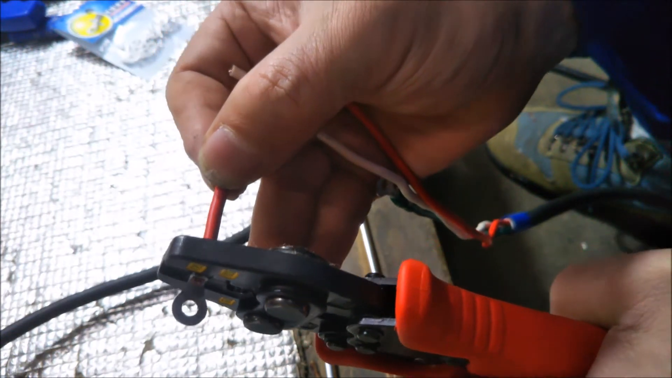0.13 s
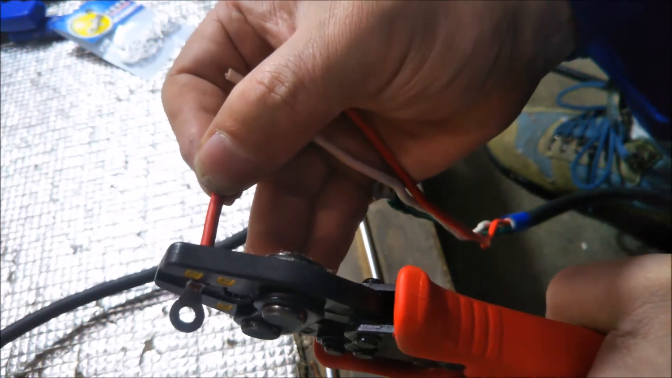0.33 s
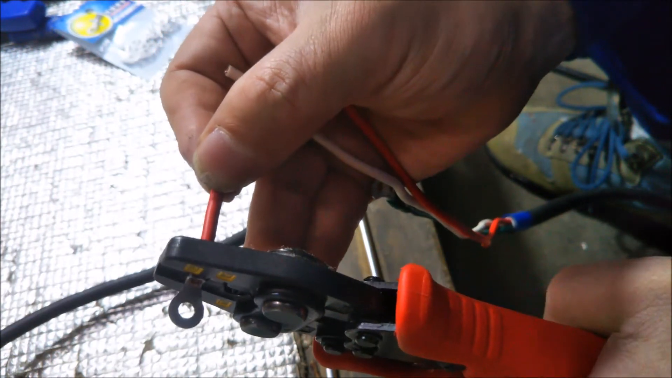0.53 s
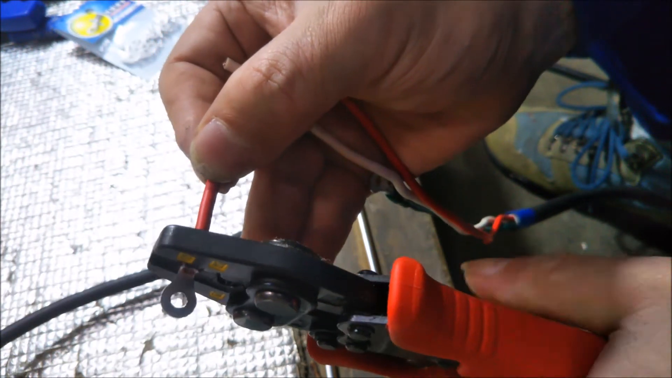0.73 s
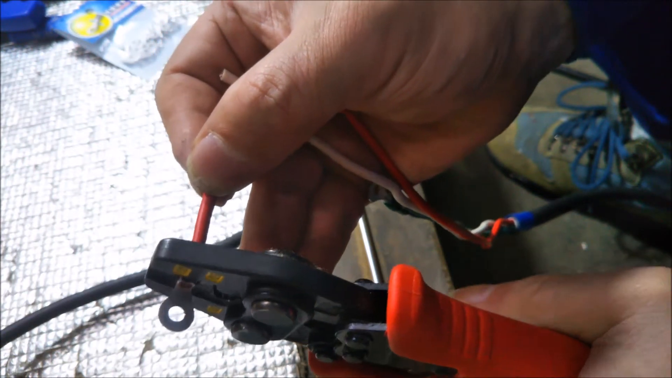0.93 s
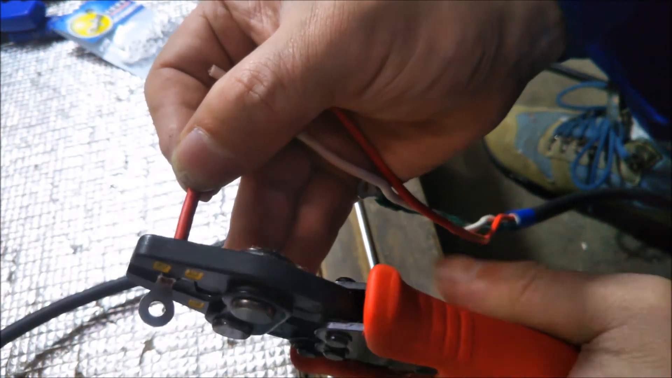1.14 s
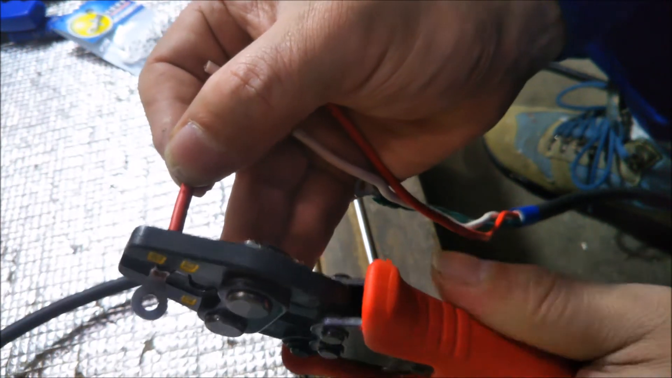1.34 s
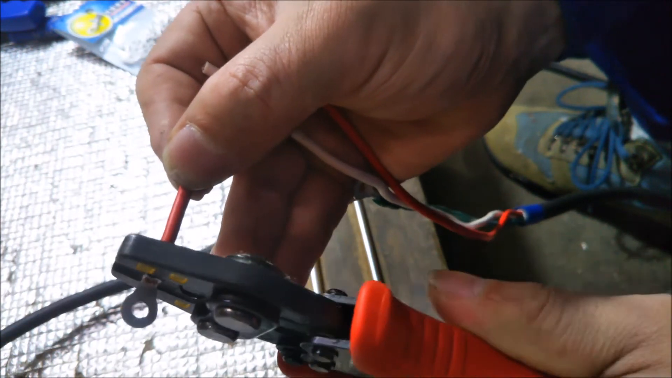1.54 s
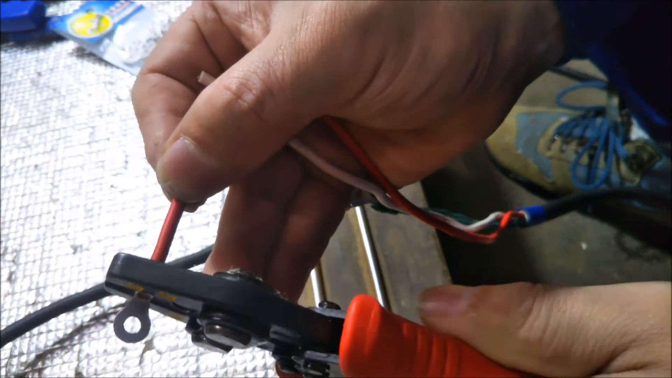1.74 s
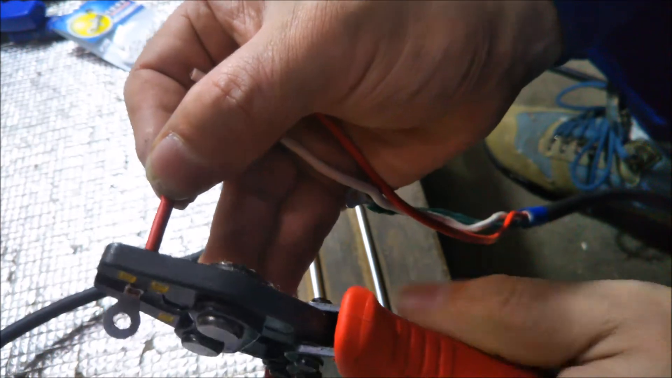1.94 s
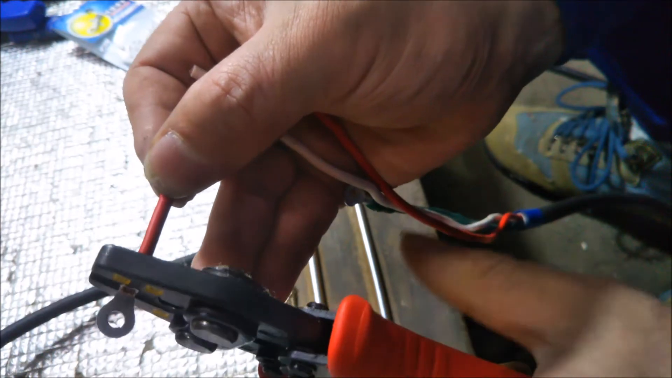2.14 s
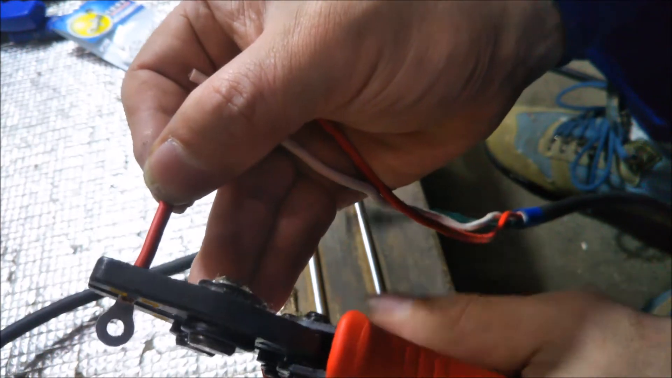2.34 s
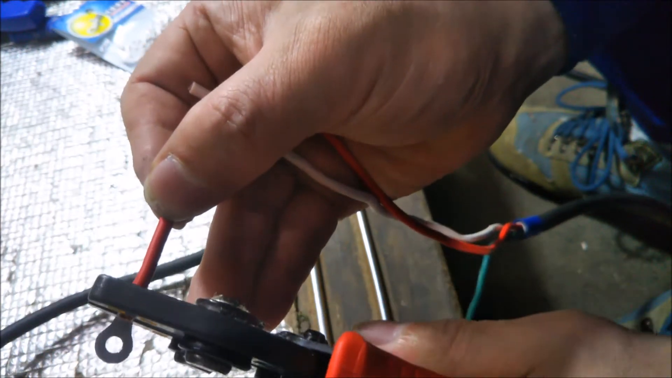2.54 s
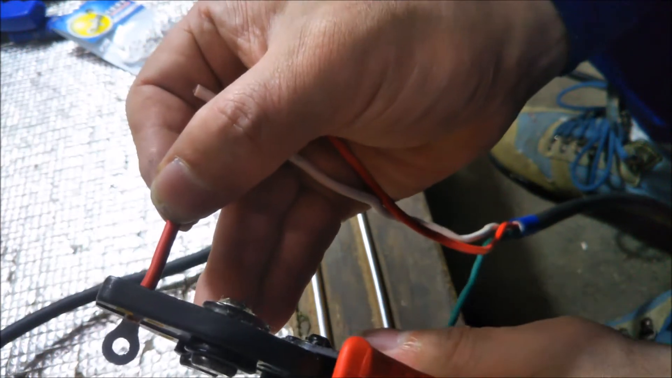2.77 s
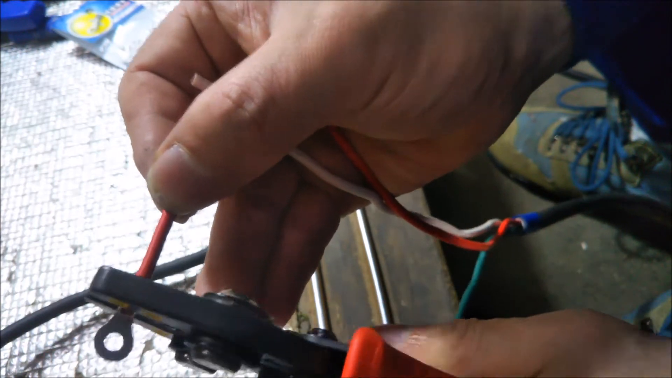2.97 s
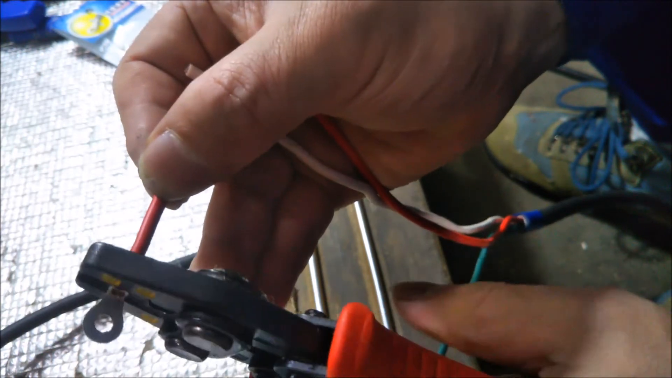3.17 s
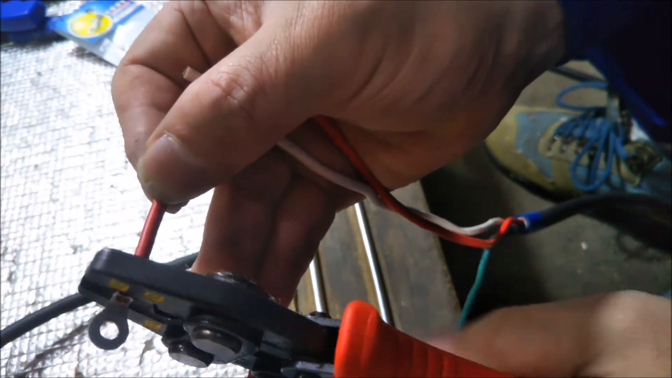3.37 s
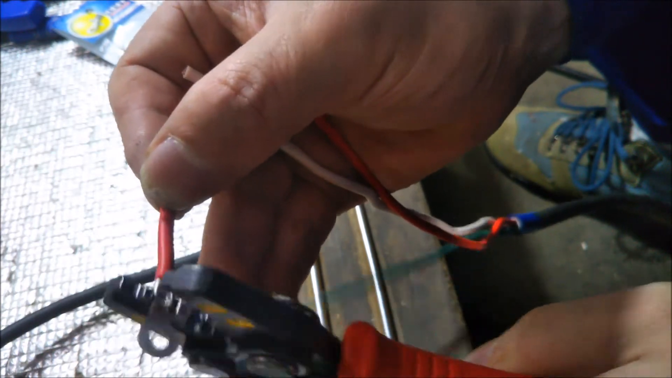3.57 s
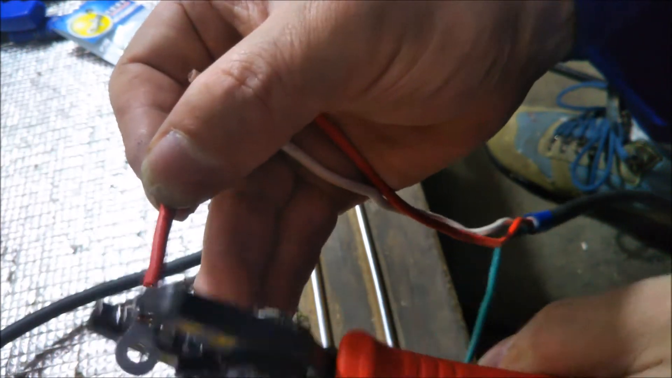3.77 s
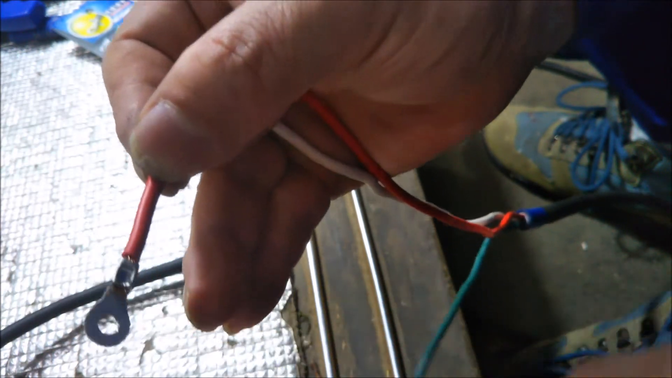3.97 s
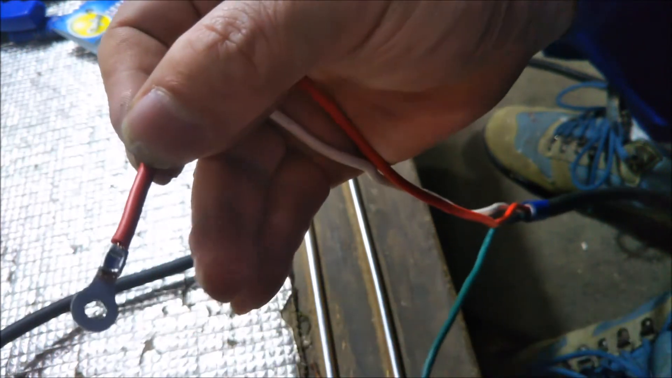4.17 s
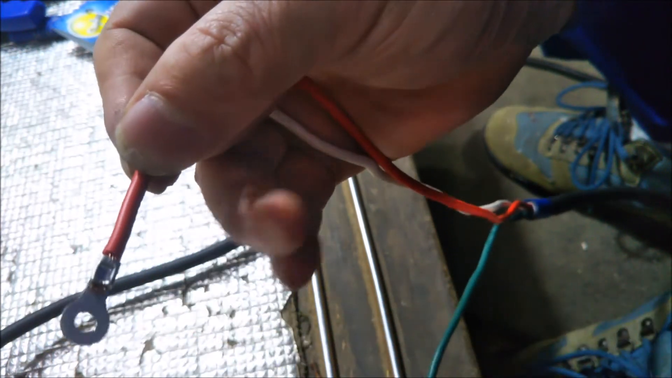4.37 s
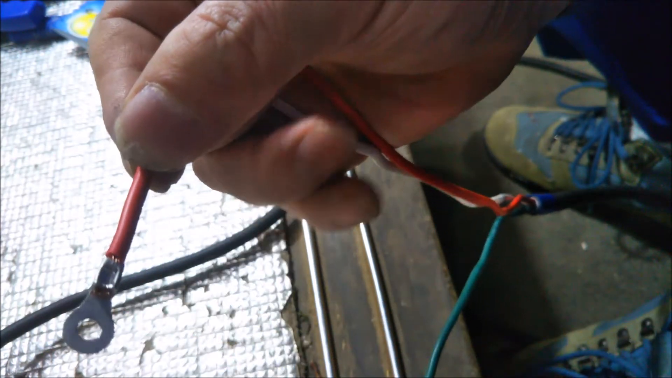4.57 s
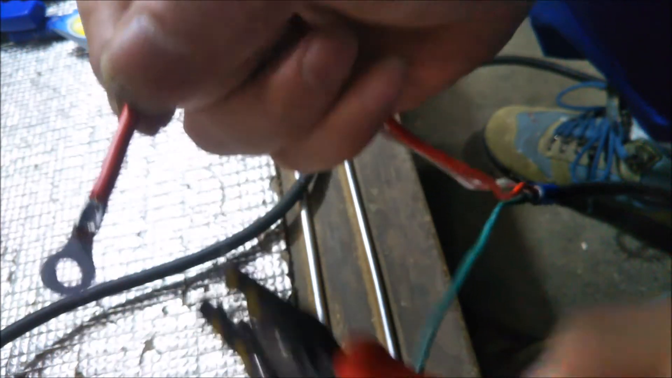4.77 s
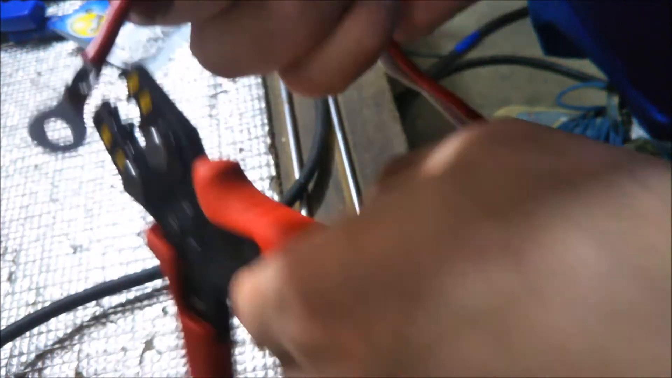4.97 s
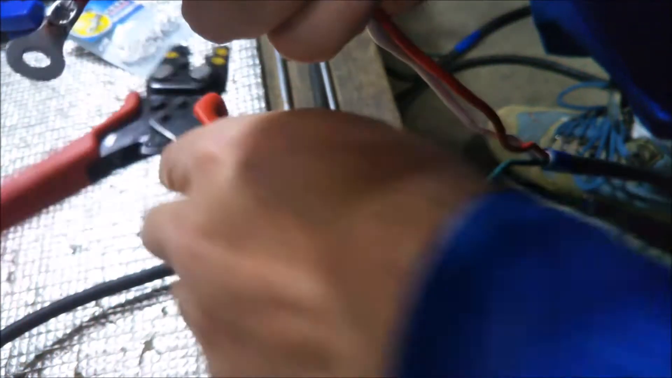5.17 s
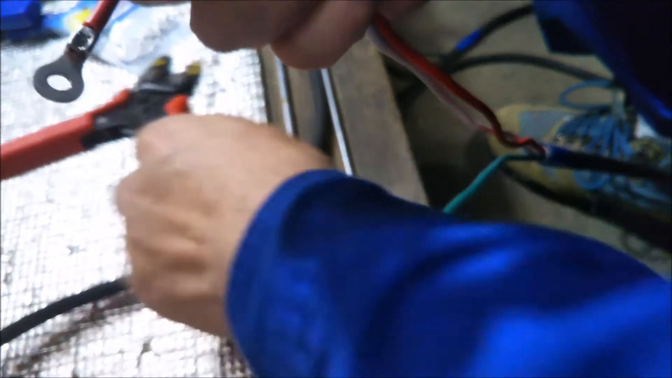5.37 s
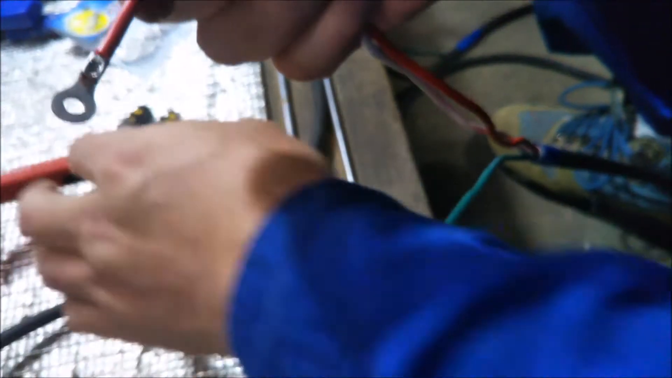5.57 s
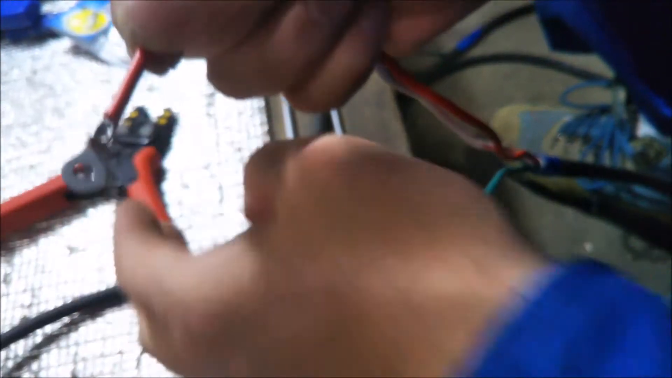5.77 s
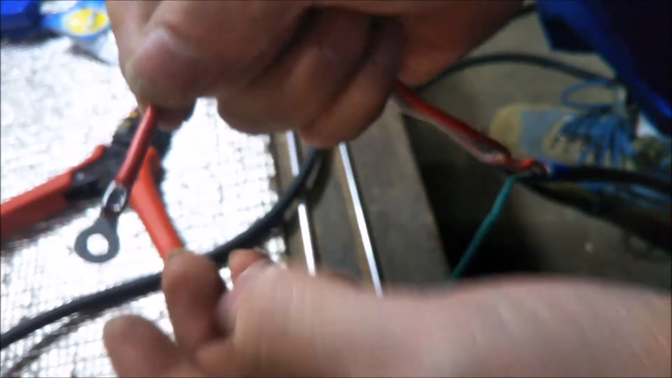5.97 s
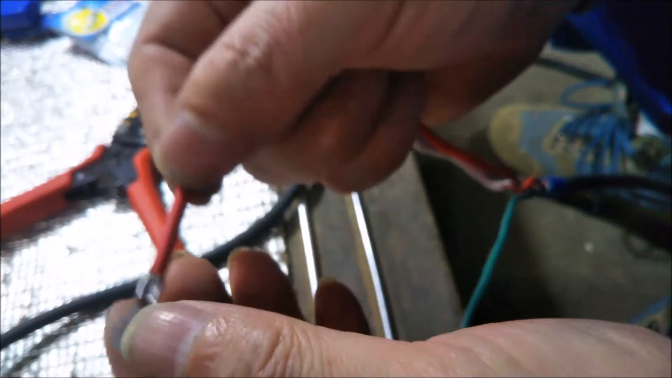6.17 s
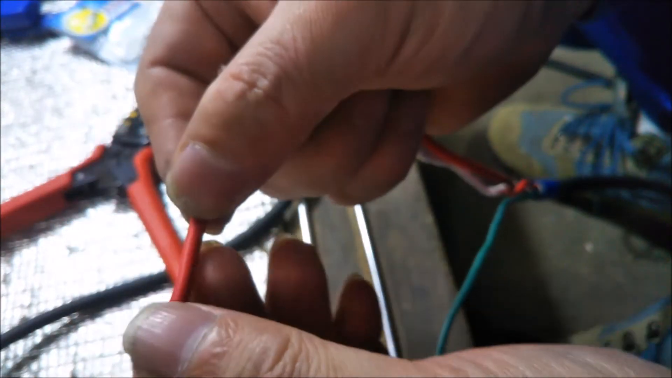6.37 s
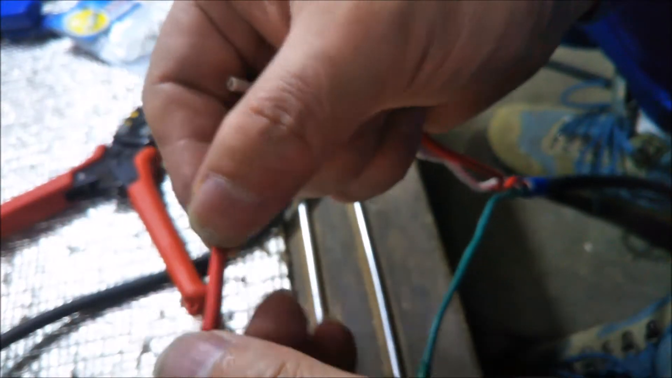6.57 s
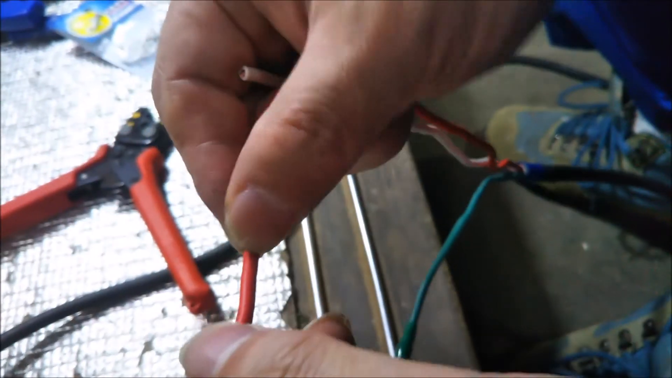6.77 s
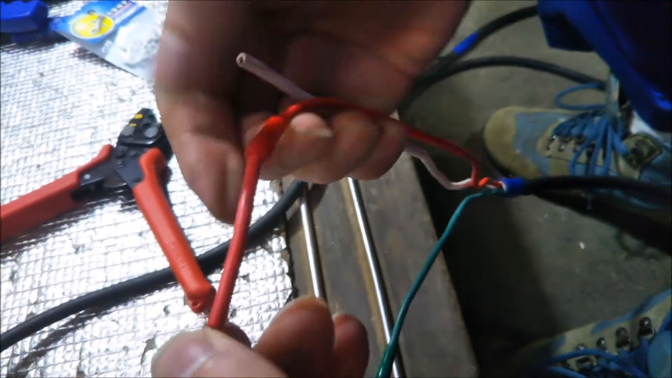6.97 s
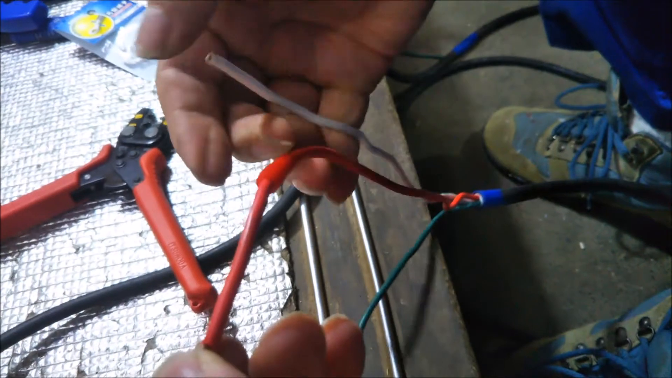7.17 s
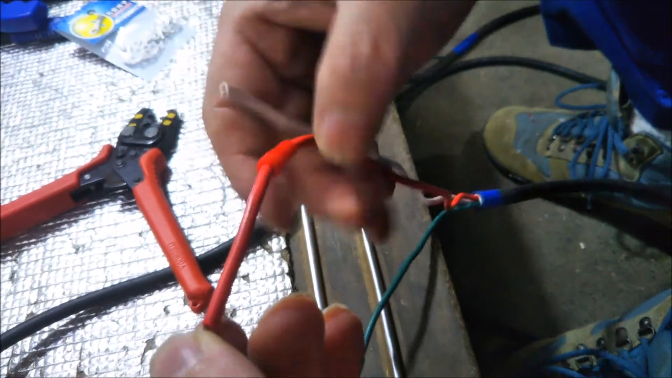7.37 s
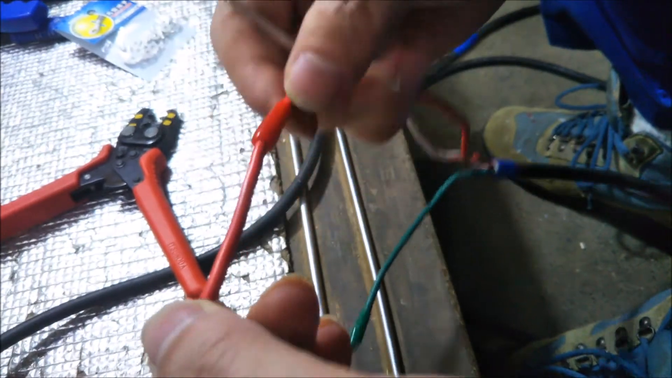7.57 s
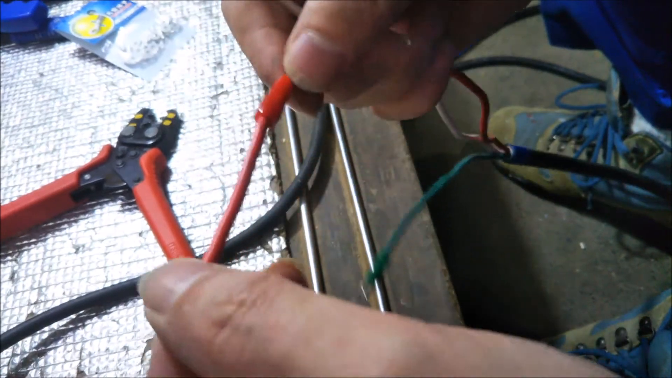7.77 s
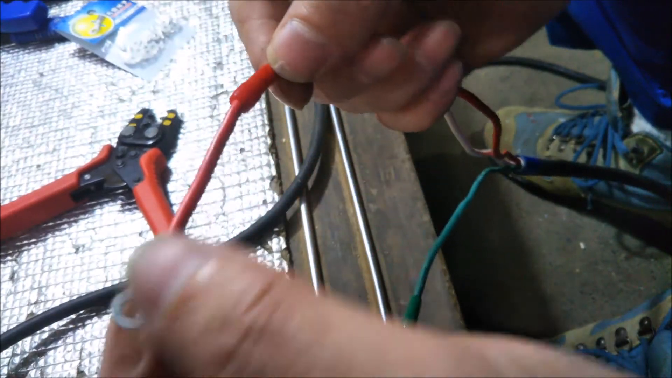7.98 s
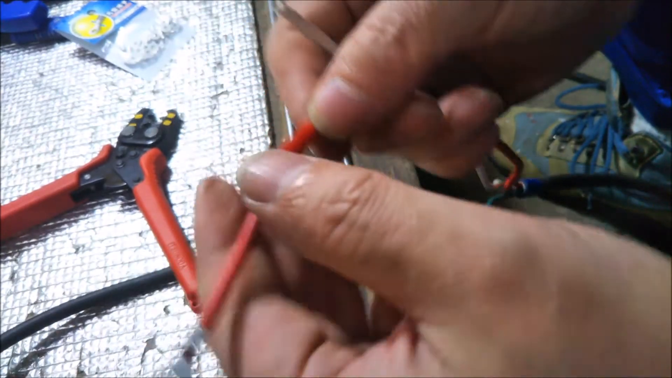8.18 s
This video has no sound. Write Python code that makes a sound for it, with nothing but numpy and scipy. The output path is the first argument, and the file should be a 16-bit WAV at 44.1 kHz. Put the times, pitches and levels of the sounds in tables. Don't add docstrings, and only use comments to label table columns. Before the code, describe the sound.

A low ventilation hum and faint, drifting hiss run throughout in a workshop, heard through a small camera microphone very close to the action. A sharp ratchet click is already ringing at 0 seconds; another snaps at 0.3 and the loudest of these at 0.9, each bright, dry and thinly ringing. A softer double click comes at 2.4. Faint rubs precede the release at 3.4, when about fourteen loud clicks rattle past, quickening until 3.57, with a springy pluck and a tiny fading shiver at the stop. Soft low rubbing and faint touches follow around 4.3. Steel taps wood at 4.7, then knocks hard at 4.82 with a brief rebound. At 5.53 the tool lands on a padded bench: a low boom, rapid bounces, a rough scrape and bright ticks settling by 5.8. Afterwards just hum and slight hand rubs near 6.0, 6.8 and 7.9, until about 8 seconds.

```python
import sys
import numpy as np
from scipy import signal
from scipy.fft import rfft, irfft, next_fast_len
from scipy.io import wavfile
from scipy.ndimage import uniform_filter1d

SR = 44100
rng = np.random.default_rng(int(sys.argv[2]) if len(sys.argv) > 2 else 0)


def field_ratio(decibels):
    return 10 ** (np.asarray(decibels, dtype=float) / 20)


def materialize(psi):
    bounded = np.clip(np.atleast_2d(psi).T, -1, 1)
    quanta = np.round(bounded * 32767).astype(np.int16)
    wavfile.write(sys.argv[1], SR, quanta)


N = 362046
LEAD = SR // 10

# pitch in Hz, width in Hz, level in dB.
PAWL = [(10700, 500, -2), (11900, 880, -1), (13600, 690, 4)]
# pitch in Hz, width in Hz, level in dB.
RACK = [(5830, 270, -2.5), (6910, 890, -2.5), (8630, 3300, -6)]
# pitch in Hz, width in Hz, level in dB.
JAWS = [(2350, 1800, -2), (3780, 2360, 5.5), (4470, 1030, 8)]


def unit(x):
    return x / np.sqrt(np.mean(x ** 2) + 1e-20)


def along(points, hz):
    f, v = np.transpose(points)
    return np.interp(np.log(hz + 1), np.log(f + 1), v)


def filtered(x, response):
    m = next_fast_len(x.shape[-1] + 8192)
    hz = np.fft.rfftfreq(m, 1 / SR)
    return irfft(rfft(x, m) * response(hz), m)[..., :x.shape[-1]]


def resonances(modes):
    def response(f):
        total = 0
        for k, (centre, width, db) in enumerate(modes):
            damping = 1j * f * width
            total = total + (-1) ** k * field_ratio(db) * damping / (centre * centre - f * f + damping)
        return total
    return response


def noise(spectrum):
    return unit(filtered(rng.standard_normal(N), lambda hz: field_ratio(along(spectrum, hz))))


def blow(contact_ms, modes, size=4096):
    ms = np.arange(size) * 1000 / SR
    y = filtered(ms * np.exp(-ms / contact_ms), resonances(modes))
    return y / np.abs(y).max()


def burst(rise_ms, t60_ms, modes, size=4096):
    ms = np.arange(size) * 1000 / SR
    shape = (1 - np.exp(-ms / rise_ms)) ** 2 * field_ratio(-60 * ms / t60_ms)
    impacts = np.tanh(2 * rng.standard_normal(size))
    y = filtered(shape * impacts, resonances(modes))
    return y / np.abs(y).max()


def ringing(modes, scatter_db, attack_ms, size):
    t = np.arange(size) / SR
    y = np.zeros(size)
    for hz, db, t60 in modes:
        y += field_ratio(db + scatter_db * rng.normal() - 60 * t / t60) * np.sin(2 * np.pi * hz * t)
    return y * (1 - np.exp(-1000 * t / attack_ms))


def rings_on(modes, swell):
    y = np.zeros(SR // 2)
    for hz, db, t60 in modes:
        y += ringing([(hz, db, t60)], scatter_db=4.0, attack_ms=1000 * swell * t60 + .5, size=SR // 2)
    return y


def silence():
    return np.zeros(LEAD + N + SR)


def add(track, s, y):
    track[LEAD + round(s * SR):][:len(y)] += y


def workshop():
    # pitch in Hz, level in dB per Hz.
    hum = [(15, -51), (25, -2), (39, -6.5), (59, 1.5), (112, -4.5), (150, -7), (229, -6.5), (318, -11.5),
           (624, -9.5), (715, -10.5), (772, -11.5), (1320, -10), (2500, -14.5), (3250, -41), (5500, -120)]
    # pitch in Hz, level in dB per Hz.
    hiss = [(880, -32), (1500, 0.5), (2270, -1), (2740, -1.5), (3010, -3), (3560, -5.5), (4140, -7.5),
            (4720, -11), (5810, -25), (6440, -20), (7850, -15.5), (9840, -16.5), (14200, -12.5)]
    above = lambda hz: np.clip(hz / 1000 - 1.5, 0, 1)
    low = filtered(noise(hum), lambda hz: np.sqrt(1 - above(hz)))
    high = filtered(noise(hiss), lambda hz: np.sqrt(above(hz)))
    z = signal.stft(low + field_ratio(-2.5) * high, nperseg=512)[2]
    patches = uniform_filter1d(rng.standard_normal(z.shape), size=8, axis=0)
    patches = uniform_filter1d(patches, size=12, axis=1)
    air = signal.istft(z * field_ratio(0.97 * unit(patches)), nperseg=512)[1][:N]
    return field_ratio(-53) * unit(air)


def room(x):
    # pitch in Hz, time to fall by 60 dB in seconds.
    walls = [(100, 0.35), (1000, 0.51), (4000, 0.97), (14000, 0.92)]
    hz, t, z = signal.stft(rng.standard_normal(SR // 2), SR, nperseg=256)
    tail = signal.istft(z * field_ratio(-60 * t / along(walls, hz)[:, None]), SR, nperseg=256)[1]
    tail = tail * (1 - np.exp(-np.arange(len(tail)) / SR / 0.0035))
    return signal.fftconvolve(x, tail / np.linalg.norm(tail))[:len(x)]


def rubs():
    # start in seconds, length in seconds, level in dB, centre in Hz, width in Hz.
    slides = [
        (1.496, 0.15, -66, 5000, 2500),
        (2.163, 0.12, -67, 11000, 2000),
        (2.955, 0.15, -62.5, 7360, 1600),
        (3.138, 0.075, -57, 520, 149),
        (4.277, 1, -56.5, 696, 910),
        (4.372, 0.14, -55.5, 1070, 148),
        (6.018, 0.12, -64, 6500, 3000),
        (6.786, 0.11, -66.5, 7000, 4020),
        (7.882, 0.15, -64, 8600, 2500),
    ]
    out = silence()
    for s, length, db, hz, width_hz in slides:
        progress = np.clip(np.arange(SR // 2) / SR / length, 0, 1)
        band = lambda f: np.exp(-((f - hz) / width_hz) ** 2)
        hiss = unit(filtered(rng.standard_normal(SR // 2), band))
        add(out, s, field_ratio(db) * np.sin(np.pi * np.sqrt(progress)) * hiss)
    return out


def thumps():
    # start in seconds, level in dB.
    bounces = [(5.5374, -14), (5.5444, -16), (5.5525, -18.5), (5.5587, -11.5), (5.598, -28), (5.615, -36.5),
               (5.645, -43), (5.694, -35), (5.708, -48), (5.75, -47), (5.823, -47)]
    # pitch in Hz, level in dB, time to fall by 60 dB in seconds.
    top_tones = [(128, 5, 0.055), (175, -10.5, 0.1), (240, -24, 0.15), (325, -12, 0.016)]
    leg_tones = [(80, 1.5, 0.085)]
    out = silence()
    for s, db in bounces:
        add(out, s, field_ratio(db) * ringing(top_tones, scatter_db=2.5, attack_ms=3.4, size=SR // 2))
        add(out, s, field_ratio(0.91 * db) * ringing(leg_tones, scatter_db=2.0, attack_ms=4.5, size=SR // 2))
    return out


def ticks():
    # start in seconds, peak in dB, treble in dB.
    taps = [(5.5268, -18.5, -23), (5.5337, -16, -11), (5.5384, -28, -11), (5.541, -22.5, 8),
            (5.5505, -24, -10), (5.5557, -25, -17), (5.5967, -31, 2), (5.6068, -35, -8),
            (5.6433, -35.5, -1), (5.6488, -39, 8), (5.688, -29, -6), (5.6937, -33.5, -10),
            (5.699, -33, -12), (5.7284, -41.5, 5), (5.7364, -44, 9), (5.7511, -24.5, -26)]
    dull_modes = [(1470, 1400, -5), (2640, 1100, -0.5), (3520, 670, -1.5)]  # Hz, width in Hz, dB
    out = silence()
    for s, db, treble_db in taps:
        add(out, s, field_ratio(db - 2.5) * burst(0.08, 21, dull_modes))
        add(out, s, field_ratio(db + treble_db - 5.0) * burst(0.66, 13, RACK + PAWL))
    return out


def scrapes():
    # start in seconds, length in seconds, level in dB, fade in dB per second.
    strokes = [
        (5.531, 0.11, -28, 404),
        (5.641, .1, -53, 35),
    ]
    # pitch in Hz, level in dB.
    pad_colour = [(400, -8.5), (900, -4.5), (2600, -9), (4500, -12.5), (5800, -27)]
    # pitch in Hz, level in dB.
    fizz_colour = [(5500, -40), (7000, -6), (10000, 4.5), (13500, 0), (15000, 1)]
    rise_s, end_db_per_s, fizz_db, fizz_follow = 0.0036, 424, -9.5, 0.76
    body, fizz = np.zeros(N), np.zeros(N)
    for s, length, db, fade in strokes:
        t = np.clip(np.arange(N) / SR - s, 0, 1)
        rise = 1 - np.exp(-t / rise_s)
        level_db = db - fade * t - end_db_per_s * np.maximum(t - length, 0)
        body += rise * field_ratio(level_db)
        fizz += rise * field_ratio(fizz_follow * level_db)
    grit = field_ratio(3.2 * unit(uniform_filter1d(rng.standard_normal(N), size=90)))
    out = silence()
    add(out, 0, grit * (body * noise(pad_colour) + field_ratio(fizz_db) * fizz * noise(fizz_colour)))
    return out


def knocks():
    # start in seconds, peak in dB, treble in dB, bass in dB.
    hits = [
        (4.278, -41, -25, -24),
        (4.333, -39, -22, -7),
        (4.354, -48, -25, -13),
        (4.679, -21.5, -23, -30),
        (4.683, -18.5, -25, -31),
        (4.6845, -17, -31, -17),
        (4.8225, -31, -20.5, -25),
        (4.8245, -3.5, -33.5, -22),
        (4.8285, -18, -33.5, -10.5),
        (4.834, -16.5, -40, -16),
    ]
    # pitch in Hz, width in Hz, level in dB.
    rail_modes = [(390, 540, 8), (583, 620, 2.5), (910, 75, -5), (1180, 570, 6), (1576, 244, 10),
                  (2090, 1280, 2), (3240, 200, -24), (3330, 230, -2), (4200, 1100, -3)]
    # pitch in Hz, level in dB, time to fall by 60 dB in seconds.
    tap_tones = [(829, -29, .05), (1555, -20, .045), (3000, -33, .03)]
    knock_tones = [(570, -39, 0.036), (1000, -28, .07), (1230, -25, 0.038), (1396, -23, 0.11),
                   (2134, -29.5, 0.15), (3050, -37.5, 0.15), (3580, -23.5, 0.023)]
    push_modes = [(107, 30, -5.0), (176.0, 79, 4.0), (252, 220, -1)]  # Hz, width in Hz, dB
    wood, steel = rail_modes[:-1], RACK + PAWL
    out = silence()
    for s, db, treble_db, bass_db in hits:
        add(out, s, -field_ratio(db - 2.0) * blow(0.04, wood))
        add(out, s + .0007, field_ratio(db - 10) * burst(0.21, 35, wood))
        add(out, s, field_ratio(db + bass_db + 4.0) * burst(0.73, 69, push_modes, size=8192))
        add(out, s, field_ratio(db + treble_db + 14) * burst(.3, 12, steel))
        add(out, s, field_ratio(db - 19.5) * burst(4.0, 254, wood, size=16384))
        add(out, s, field_ratio(db + treble_db - 8) * burst(3.3, 220, steel, size=16384))
    add(out, hits[5][0], rings_on(tap_tones, swell=.03))
    add(out, hits[7][0], rings_on(knock_tones, swell=0.014))
    return out


def click(db, rack_db, jaw_db, handle_db, chatter_db):
    parts = [(PAWL, -2.5, 0, -28),  # ringing, share in dB, delay in seconds, walls in dB
             (RACK, rack_db + 0.5, .0003, -27),
             (JAWS, jaw_db, .0006, -22)]
    handle_modes = [(470, 720, -4), (1830, 140, -4.5)]  # Hz, width in Hz, dB
    out = np.zeros(LEAD + 12288)
    for modes, share_db, late, wall_db in parts:
        part_db = db + share_db
        add(out, late, field_ratio(part_db) * burst(0.31, 3.5, modes, size=2048))
        add(out, late + .0012, field_ratio(part_db + chatter_db) * burst(.5, 14, modes, size=2048))
        add(out, 0, field_ratio(part_db + wall_db) * burst(11.0, 280, modes, size=12288))
    add(out, 0, field_ratio(db + handle_db) * burst(0.75, 28, handle_modes, size=2048))
    return out[LEAD:]


def release():
    # start in seconds, peak in dB, rack in dB.
    clicks = [(3.4345, -2, -11.5), (3.4447, -4, -10), (3.4553, 0.5, -8.5), (3.4930, -4, -3.5),
              (3.5131, -4, -7), (3.5263, -2.5, -13.5), (3.5355, -7.5, 2), (3.5424, -3.5, -3),
              (3.5485, -4, -6), (3.5542, -4, -10), (3.5587, -9.5, -3.5), (3.5628, -6.5, 0.5),
              (3.5667, -9, -2), (3.5705, -5, -17)]
    # pitch in Hz, level in dB, time to fall by 60 dB in seconds.
    spring_tones = [(4640, -13, .05), (13400, -27, .04)]
    # start in seconds, level in dB.
    plucks = [
        (3.513, -19),
        (3.527, -18),
        (3.566, 1),
    ]
    handle_grows = 109
    out = silence()
    for s, db, rack_db in clicks:
        jaw_db = -13.5 + handle_grows / 4 * (s - clicks[4][0]) + rng.normal()
        handle_db = -41 + handle_grows * (s - clicks[0][0]) + 2.4 * rng.normal()
        chatter_db = -11 + 1.2 * rng.normal()
        add(out, s, click(db, rack_db, jaw_db, handle_db, chatter_db))
    for s, db in plucks:
        add(out, s, field_ratio(db) * rings_on(spring_tones, swell=.2))
    return out


def jaws_stop():
    # pitch in Hz, level in dB, time to fall by 60 dB in seconds.
    stop_tones = [(1700, -31, .07), (5310, -56, .6), (4600, -38.5, .15)]
    stop_s, gap_s, first_db, loss_db = 3.578, .0046, -15.5, 4
    out = silence()
    for k in range(6):
        dull_db = 4.5 * k
        shiver = click(first_db - loss_db * k, -22 + dull_db, -22.5 + dull_db, -24 + dull_db, 2.5)
        add(out, stop_s + gap_s * k, shiver)
    add(out, stop_s + 0.0054, rings_on(stop_tones, swell=0.056))
    return out


def teeth():
    # start in seconds, peak in dB, chatter in dB, walls in dB.
    drops = [
        (-.012, -5.5, -12, 3.5),
        (0.2957, -8, -10, 7),
        (0.886, -4.5, -19.5, 2),
        (2.3765, -18.5, -3, 12.5),
        (2.383, -27, -3, 6),
    ]
    # pitch in Hz, width in Hz, level in dB.
    first_modes = [(2390, 110, -38), (3740, 390, -12.5), (5550, 270, -15), (6600, 430, -17.5),
                   (8240, 310, -18), (8830, 350, -15.5), (10050, 390, -10), (11950, 350, -11.5),
                   (12870, 260, -4), (13410, 280, 1.5)]
    second_modes = [(2050, 470, -22.5), (3600, 420, -12), (5600, 330, -21.5), (6650, 140, -9),
                    (8840, 300, -5.5), (10530, 190, -5.5), (11000, 410, -4.5), (13100, 820, 0.5)]
    third_modes = [(3040, 280, -20), (4770, 200, -23), (5470, 250, -21), (6500, 700, -19), (7900, 210, -12),
                   (8630, 220, -11.5), (10500, 220, -13), (11600, 120, -7.5), (12630, 240, -12),
                   (13330, 220, -1.5)]
    # pitch in Hz, level in dB, time to fall by 60 dB in seconds.
    early_tones = [(7660, -44.5, 0.29), (8310, -60, .75), (6810, -65, .36), (3180, -56, 0.4),
                   (4300, -42, 0.11)]
    late_tones = [(3152, -47.5, .55), (3745, -51, .25), (2560, -51, .15), (6858, -64, .22),
                  (8301, -52, .33), (8489, -57, .3), (8100, -57, .3)]
    out = silence()
    all_modes = (first_modes, first_modes, second_modes, third_modes, third_modes)
    for (s, db, chatter_db, wall_db), modes in zip(drops, all_modes):
        add(out, s, field_ratio(db) * blow(0.0046, modes))
        add(out, s + .0004, field_ratio(db - 22) * blow(0.0057, modes))
        add(out, s + 0.0011, field_ratio(db + chatter_db) * burst(0.45, 8, modes))
        add(out, s, field_ratio(db + wall_db - 32) * burst(1.4, 245, RACK + PAWL, size=16384))
        add(out, s, field_ratio(db + wall_db - 40.5) * burst(0.83, 240, JAWS, size=16384))
    for (s, *_), tones, swell in zip(drops, (early_tones, early_tones, late_tones), (.02, .04, .1)):
        add(out, s, rings_on(tones, swell))
    return out


def scene():
    landing = thumps() + ticks() + scrapes()
    tool = teeth() + release() + jaws_stop() + knocks() + landing
    near = tool + rubs() + field_ratio(-13.5) * room(landing)
    port = lambda hz: 1 - 0.83 * np.exp(-((hz - 5900) / 450) ** 2)
    return (filtered(near[LEAD:LEAD + N], port) + workshop())[None]


def starve(x):
    # middle in seconds, shortage in dB; a greater shortage reaches lower.
    short_frames = [(.187, 22), (.784, 9), (1.68, 5), (1.765, 11), (2.256, 11), (2.575, 5), (2.746, 7),
                    (2.96, 10.5), (3.749, 8), (4.069, 9), (4.154, 15), (4.176, 16.5), (4.24, 4),
                    (4.752, 11), (5.242, 6), (5.349, 7), (5.626, 6), (5.84, 6.5), (6.586, 5.5), (6.629, 7),
                    (7.397, 14), (7.61, 10), (7.781, 6), (8.08, 11), (8.122, 6), (8.186, 11)]
    size = round(1024 * SR / 48000)
    frame_s, first_s = size / SR, .0146
    y = np.pad(x, (0, 2 * size))
    window = np.sin(np.pi * (np.arange(2 * size) + .5) / (2 * size))
    hz = np.fft.rfftfreq(2 * size, 1 / SR)
    lost = np.zeros_like(y)
    for s, short_db in short_frames:
        a = round(first_s * SR) + (round((s - first_s) / frame_s) - 1) * size
        rising, falling = (window * y[a:a + 2 * size]).reshape(2, size)
        z = rfft(np.r_[rising - rising[::-1], falling + falling[::-1]])
        low_hz = 5740 * field_ratio(-0.34 * short_db)
        nearby = uniform_filter1d(np.abs(z), size=40)
        weak = np.abs(z) < 1.9 * nearby * np.clip(hz / low_hz, 0, 2.5) ** .8
        reached = (hz > .3 * low_hz) & (hz < 13400)
        lost[a:a + 2 * size] += window * irfft(z * weak * reached * (1 - field_ratio(-3 * short_db)), 2 * size)
    return (y - lost)[:N]


def spend(x):
    # start in seconds, length in ms, low edge in Hz, high edge in Hz, depth in dB.
    gaps = [
        (3.5765, 9.5, 5500, 12300, -14),
        (3.5755, 8, 100, 3800, -14),
        (4.8282, 14.8, 3900, 13300, -30),
        (5.7195, 8, 4500, 13300, -10),
        (5.7305, 5, 4500, 13300, -10),
        (5.739, 10, 4500, 13300, -10),
    ]
    t = np.arange(N) / SR
    for s, length_ms, low_hz, high_hz, depth_db in gaps:
        gate = uniform_filter1d(1. * ((t > s) & (t < s + length_ms / 1000)), size=60)
        band = filtered(x, lambda hz: (hz > low_hz) & (hz < high_hz))
        x = x - gate * (1 - field_ratio(depth_db)) * band
    return x


def top_cut(x):
    return signal.sosfilt(signal.butter(12, 15710, fs=SR, output="sos"), x)


def record(dry):
    ceiling = 0.59
    kept_curve = [(13600, 0), (14150, 2.5), (14330, -6), (14500, -70), (20000, -120)]  # Hz, dB
    over_curve = [(14300, -89), (14400, -19), (15650, -17), (16500, -50.5), (17000, -120)]  # Hz, dB
    held = dry[0] / (1 + (dry[0] / ceiling) ** 4) ** (1 / 4)
    kept = filtered(held, lambda hz: field_ratio(along(kept_curve, hz)))
    over = filtered(held, lambda hz: field_ratio(along(over_curve, hz)))
    kept = signal.sosfilt(signal.butter(2, 44, 'high', fs=SR, output='sos'), kept)
    loud = np.clip(uniform_filter1d(np.abs(over), size=300) / field_ratio(-76) - 1, 0, 1)
    mix = spend(starve(kept + loud * over))
    return top_cut(mix[None])


dry = scene()
out = record(dry)
materialize(out)
```